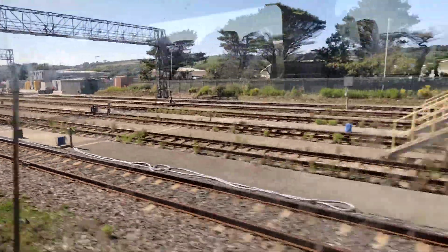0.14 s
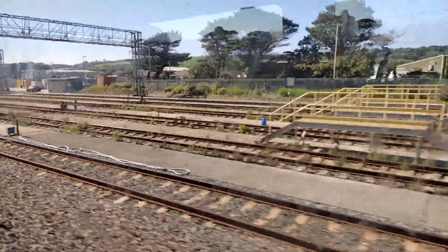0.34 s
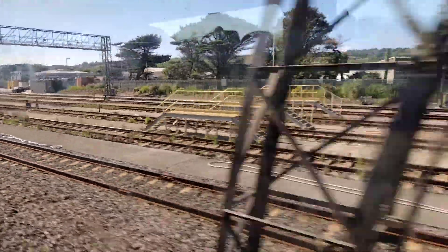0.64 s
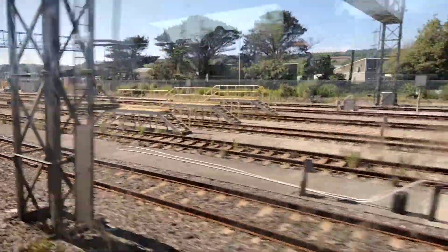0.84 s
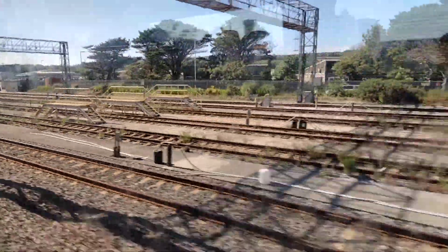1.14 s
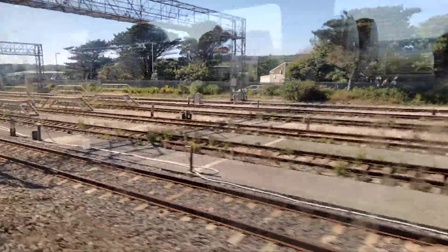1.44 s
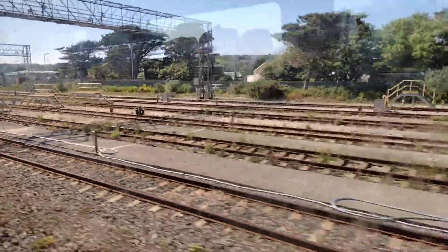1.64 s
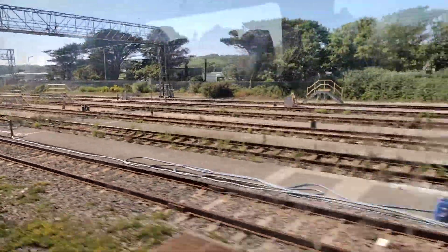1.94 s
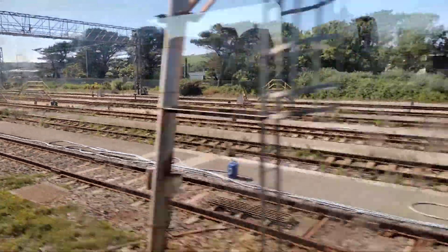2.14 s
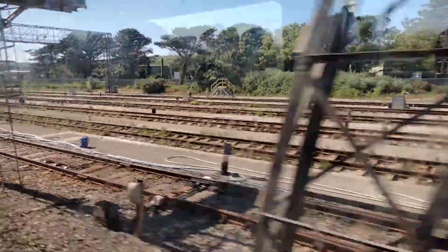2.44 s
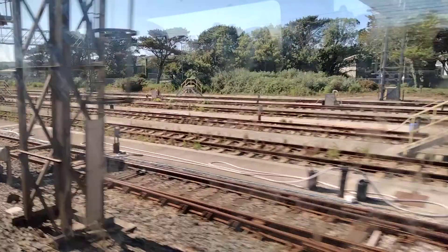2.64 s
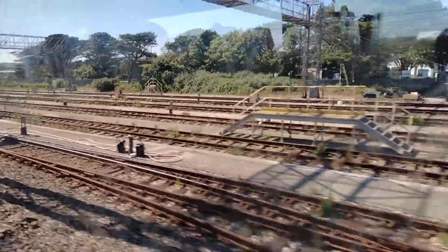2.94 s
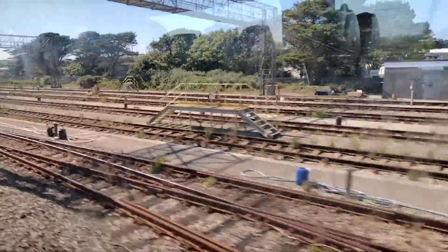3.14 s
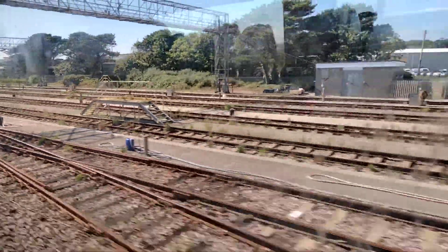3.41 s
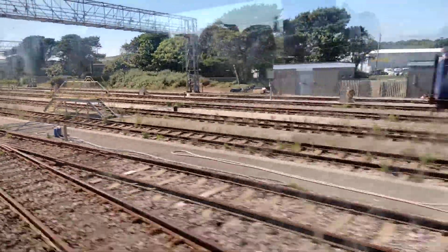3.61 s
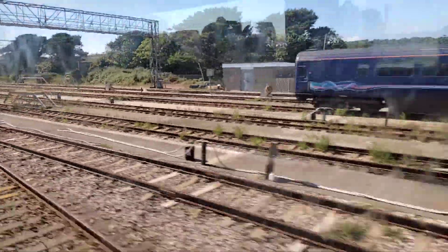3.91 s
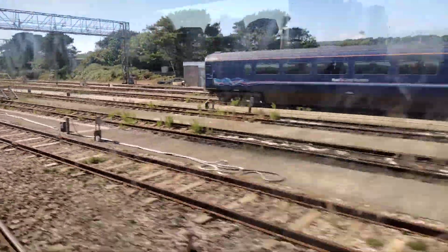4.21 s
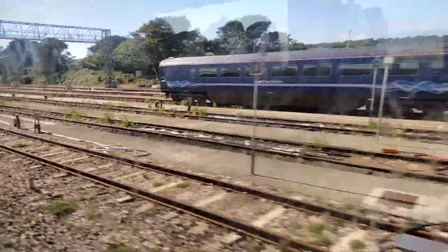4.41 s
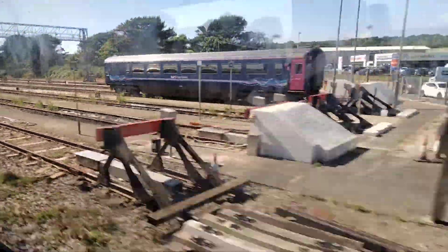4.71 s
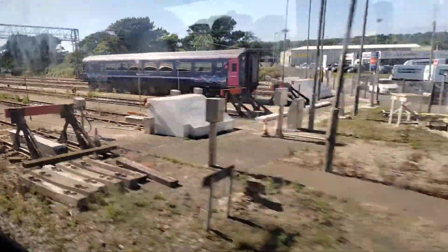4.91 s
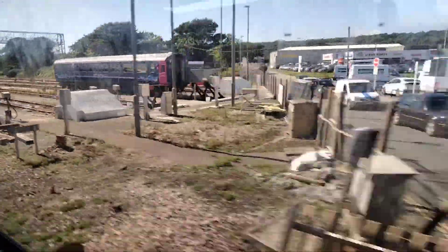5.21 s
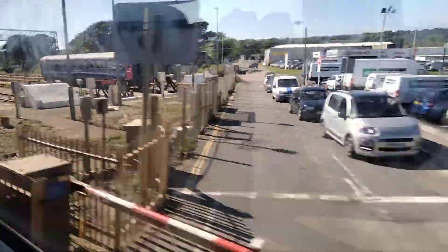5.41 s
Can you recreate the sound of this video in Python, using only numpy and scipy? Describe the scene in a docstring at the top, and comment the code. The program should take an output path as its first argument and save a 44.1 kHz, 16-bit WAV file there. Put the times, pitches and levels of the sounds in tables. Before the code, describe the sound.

Inside a moving train, deep wheel rumble and paired rail-joint knocks swell to a roar over points, with sharp rustles close by.

```python
"""Inside a passenger train rolling through a depot yard: wheels rumble through the floor, knock in pairs at the
rail joints and roar louder over a set of points, above the steady hum of machinery and the rush of air vents.
Close by, something rustles and scuffs in short, sharp bursts, and the swaying interior squeaks faintly.
Wheels, air and rubbing are filtered noise, the rubbing with random slips; hum and squeaks are sums of sines."""
import sys
import numpy as np
from scipy import signal
from scipy.fft import rfft, irfft
from scipy.io import wavfile
from scipy.ndimage import uniform_filter1d

SR = 44100
rng = np.random.default_rng(int(sys.argv[2]) if len(sys.argv) > 2 else 0)


def wav_record(signal):
    """Record a signal, one row per channel, as 16-bit PCM in the file named by sys.argv[1]."""
    frames = np.transpose(np.atleast_2d(signal))
    bounded = np.clip(frames, -1, 1)
    # unit amplitude maps onto the largest positive 16-bit level
    quanta = np.round(bounded * 32767).astype(np.int16)
    wavfile.write(sys.argv[1], SR, quanta)


N = 245188
TIME = np.arange(N) / SR
FREQ = np.maximum(np.arange(N // 2 + 1) * SR / N, 1)

# the track, plain at first and rough over the points; changes of level from plain track:
# time_s, floor_shaking_db, wheel_roughness_db
TRACK_CONDITION = [(0, 0, 0.5), (.6, 1, 0), (1.0, 1, 1), (2.3, 1, 1), (2.95, 2.5, 2.5), (3.22, 3, 3),
                   (3.62, 5.5, 5), (3.88, 8.5, 7), (4.15, 9, 10), (4.42, 9.5, 7), (4.52, 8.5, 4),
                   (4.76, 8, 6.5), (4.92, 9, 4), (5.13, 5, 3.5), (5.56, 6, 2)]
# rail joints, each knocked by one wheel after the other:
# first_knock_s, clatter_level_db, thud_level_db, second_knock_relative_db
RAIL_JOINTS = [(0.154, -52.5, -43.5, 5), (.425, -44.5, -34.5, -1), (1.023, -45, -46, -29),
               (1.625, -48.5, -59, -8), (2.488, -44, -53, -28), (2.733, -39, -48, -16),
               (2.984, -47, -32.5, 5.5), (3.158, -41, -50, -7.5), (3.326, -42, -39.5, 4),
               (3.495, -43, -46, -9), (3.676, -39.5, -35.5, 2), (4.003, -39, -31, 1),
               (4.277, -40.5, -30, 1), (4.583, -36, -29.5, -1), (4.875, -44.5, -45, -18),
               (5.183, -39, -41, -8.5), (5.315, -45, -48, -12)]

# narrow resonance that colours all close treble
TREBLE_PEAK_HZ, TREBLE_PEAK_WIDTH_HZ, TREBLE_PEAK_DB = 8745, 810, 15
CUTOFF_HZ = 15650


def from_db(db):
    """Amplitude ratio: 20 dB is a factor of ten."""
    return 10 ** (np.asarray(db) / 20)


def rms_one(x):
    """Normalization to unit mean power."""
    return x / np.sqrt(np.mean(x ** 2) + 1e-20)


def in_time(rows):
    """Linear interpolation of each column at every sample."""
    time_s, *columns = np.transpose(rows)
    return [np.interp(TIME, time_s, column) for column in columns]


def colour(points):
    """Spectral envelope, straight in dB over log frequency, with 24 dB per octave skirts beyond the ends."""
    hz, db = np.transpose(points)
    envelope = from_db(np.interp(np.log(FREQ), np.log(hz), db))
    skirts = np.minimum(FREQ / hz[0], 1) * np.minimum(hz[-1] / FREQ, 1)
    return envelope * skirts ** 4


def shaped(x, gain):
    """Linear filtering by multiplication in the frequency domain, then unit power."""
    return rms_one(irfft(rfft(x) * gain, N))


def drift(rate_hz):
    """Low-passed noise of unit spread: a random fluctuation, its gain halved at rate_hz."""
    return shaped(rng.standard_normal(N), 1 / (1 + (FREQ / rate_hz) ** 2))


def steady_noise(points, even_s):
    """Coloured noise divided by its running level, so its power is even over stretches longer than even_s."""
    noise = shaped(rng.standard_normal(N), colour(points))
    size = max(int(even_s * SR), 2)
    running_power = uniform_filter1d(uniform_filter1d(noise ** 2, size), size)
    return noise / np.sqrt(running_power + 1e-9)


def friction(per_s, spread_db, smooth):
    """Dry friction: tiny slips of uneven size at random moments, on a bed of smooth hiss."""
    size_db = spread_db * np.minimum(rng.exponential(1, N), 4)
    impulses = from_db(size_db) * rng.choice([-1, 1], N)
    slips = impulses * (rng.random(N) < per_s / SR)
    return rms_one(slips) + smooth * rng.standard_normal(N)


def resonance(hz, width_hz, db):
    """Resonance: one peak on a flat response, as a gain per frequency."""
    return np.sqrt(1 + (from_db(db) ** 2 - 1) / (1 + (2 * (FREQ - hz) / width_hz) ** 2))


def vents():
    """Flow noise: the air conditioning blows as stationary broadband noise, whatever the track does."""
    # air spectrum: frequency_hz, relative_level_per_hz_db
    air_spectrum = [(170, 0), (220, 11.5), (300, -2.5), (500, -9), (680, 0), (820, 9.5), (1000, 8),
                    (1150, 3), (1400, -3), (2000, -33.5)]
    return from_db(-54.5) * shaped(rng.standard_normal(N), colour(air_spectrum))


def machinery():
    """Periodic vibration: steady tones share a slight waver in pitch, and each wavers in strength."""
    # machinery tones: frequency_hz, mean_rms_level_db
    hum_tones = [(39.2, -48.5), (93.8, -45), (277.5, -61.5), (348.5, -61.5), (555.8, -57), (694.8, -58)]
    warped_time = np.cumsum(1 + 0.0018 * drift(rate_hz=2.5)) / SR
    out = np.zeros(N)
    for hz, db in hum_tones:
        rms = from_db(db + 1.54 * drift(rate_hz=3.9))
        out += rms * np.sqrt(2) * np.sin(2 * np.pi * (hz * warped_time + rng.random()))
    return out


def squeaks():
    """Stick-slip oscillation: brief tones of unsteady, gliding pitch with a few overtones."""
    # squeaks: start_s, length_s, pitch_hz, glide_share_of_pitch, unsteadiness_share_of_pitch,
    # level_before_resonance_db
    squeak_events = [(.45, 0.11, 9200, .05, .01, -75.5), (2.202, 0.054, 3780, 0.0036, .025, -76),
                     (2.265, 0.1, 2870, -0.03, 0.021, -69), (2.39, .14, 3670, -.022, 0.024, -75),
                     (2.69, 0.06, 3800, -0.01, .025, -70), (2.70, .05, 5700, 0, .012, -73),
                     (2.795, 0.06, 5640, 0, 0.0098, -71), (3.24, 0.19, 11650, 0, .022, -71),
                     (3.247, 0.17, 9270, -0.013, 0.029, -69.5), (3.25, .2, 14300, 0, .02, -75),
                     (4.375, .13, 4440, -0.027, 0.024, -62.5), (4.663, 0.059, 9000, -0.013, 0.015, -69),
                     (4.893, .05, 10200, 0, .014, -67), (5.496, 0.058, 3740, 0.011, .02, -68)]
    # fundamental and overtones: relative_level_db
    partial_levels = [4.5, -1, -5, -9]
    out = np.zeros(N)
    waver = drift(rate_hz=350)
    for start, length, hz, glide, unsteady, db in squeak_events:
        during = (TIME > start) & (TIME < start + length)
        progress = (TIME[during] - start) / length
        pitch_hz = hz * (1 + unsteady * waver[during]) * (1 + glide * (progress - .5))
        turns = np.cumsum(pitch_hz) / SR
        tone = np.zeros(len(turns))
        for k, partial_db in enumerate(partial_levels, 1):
            if k * hz < CUTOFF_HZ:
                tone += from_db(partial_db) * np.sin(2 * np.pi * k * turns)
        out[during] += from_db(db) * np.sin(np.pi * progress) * tone
    return irfft(rfft(out) * resonance(TREBLE_PEAK_HZ, TREBLE_PEAK_WIDTH_HZ, TREBLE_PEAK_DB), N)


def rustle():
    """Sliding friction: continuous light rubbing grows with the shaking, and each rub adds its power."""
    # rustle spectrum ahead of the resonance: frequency_hz, relative_level_per_hz_db
    rustle_spectrum = [(1800, 3), (3200, 1), (4400, -1), (5200, -0.5), (7500, -0.5), (9500, -2),
                       (10600, -7.5), (12500, -8), (14300, -5.5), (15500, -5.5)]
    # light rubs between the scuffs: start_s, length_s, peak_level_db
    light_rubs = [(-.08, 0.14, -64), (.12, 0.07, -69), (0.246, 0.52, -64), (1.027, .35, -63),
                  (2.167, 0.19, -59), (2.367, 0.21, -60.5), (2.67, 0.3, -61.5), (3.22, 0.82, -59.5),
                  (3.93, 0.27, -50), (4.31, 0.34, -53.5), (4.72, 0.45, -59), (5.46, 0.087, -59)]
    fullness = 0.32   # below 1 the swell of a rub is flat-topped
    shake_db, _ = in_time(TRACK_CONDITION)
    power = from_db(-71 + 1.77 * shake_db) ** 2   # dB of rubbing per dB of shaking
    for start, length, db in light_rubs:
        progress = np.clip((TIME - start) / length, 0, 1)
        swell = np.abs(np.sin(np.pi * progress)) ** fullness
        power = power + (from_db(db) * swell) ** 2
    gain = colour(rustle_spectrum) * resonance(TREBLE_PEAK_HZ, TREBLE_PEAK_WIDTH_HZ, TREBLE_PEAK_DB)
    rubbing = shaped(friction(per_s=3000, spread_db=-1.0, smooth=1.0), gain)
    return np.sqrt(power) * from_db(0.4 * drift(rate_hz=38)) * rubbing


def scuffs():
    """Friction exciting resonance: dense slips start sharply, last a moment and decay, each with its own ring."""
    # scuffs: start_s, level_db, rise_s, hold_s, t60_s, brightness_db_per_octave, ring_hz, ring_peak_db
    scuff_events = [ (1.594, -53.5, .003, 0.015, 0.29, -5, 4900, 3),
                    (1.632, -56, .005, .012, .14, -7, 4400, 0),
                    (1.769, -42.5, .006, .006, 0.17, -2, 5250, 8),
                    (2.106, -48, 0.0043, 0.0088, 0.17, 1.5, 5400, 4),
                    (2.308, -60, .003, .008, .12, 2, 11000, 4), (2.73, -49.5, .004, .01, .15, 0, 3880, 6),
                    (2.839, -55.5, .008, .01, 0.15, -4.5, 4400, 11),
                    (3.042, -43, 0.016, 0.026, 0.15, -3, 14000, 7),
                    (3.157, -58, 0.0078, 0.021, 0.23, -3, 15000, 5),
                    (3.486, -47.5, .004, 0.033, 0.42, -3.5, 9700, 7),
                    (3.673, -43.5, .009, .006, 0.23, -1, 4300, 2),
                    (3.76, -55, .004, .008, .11, 3, 12500, 10),
                    (3.869, -40, 0.019, 0.054, 0.46, -2.5, 10800, 8),
                    (4.065, -55, .002, 0.0053, .08, 7, 14200, 8), (4.297, -49, .005, .008, .12, 2, 9300, 5),
                    (4.343, -50.5, .003, .012, 0.2, 3, 12500, 4),
                    (4.379, -39, 0.031, .006, 0.37, -5.5, 9800, 16),
                    (4.774, -51, 0.018, 0.056, .25, -4, 14800, 11),
                    (5.007, -54.5, .015, .03, .15, -6, 14600, 11),
                    (5.286, -53.5, .003, .01, .4, -7, 4300, -3), ]
    # common scuff spectrum ahead of the resonances: frequency_hz, relative_level_per_hz_db
    scuff_spectrum = [(900, 5), (1700, 4.5), (2800, -0.5), (4300, 4.5), (5200, 2.5), (6500, 5.5),
                      (8000, 4.5), (9500, 3.5), (10600, 0.5), (12000, 1), (14200, 2), (15500, 1)]
    ring_width_hz = 2400
    out = np.zeros(N)
    gain = colour(scuff_spectrum) * resonance(TREBLE_PEAK_HZ, TREBLE_PEAK_WIDTH_HZ, TREBLE_PEAK_DB)
    slips = rfft(friction(per_s=2100, spread_db=3.0, smooth=1.0)) * gain
    for start, db, rise, hold, t60, bright_db, ring_hz, ring_db in scuff_events:
        age = TIME - start
        decay = from_db(-60 * np.clip((age - rise - hold) / t60, 0, 2))
        stroke = np.clip(age / rise, 0, 1) * decay
        tilt = from_db(bright_db * np.log2(FREQ / TREBLE_PEAK_HZ))
        tone = tilt * resonance(ring_hz, ring_width_hz, ring_db)
        out += from_db(db) * stroke * rms_one(irfft(slips * tone, N))
    return out * from_db(0.42 * drift(rate_hz=150))


def bumps():
    """Vibration isolation: the suspension softens each bump in the track into a short, low swell."""
    # bumps: start_s, level_db, length_s, centre_hz
    track_bumps = [(0.433, -34.5, 0.14, 65.5), (3.28, -31.5, .18, 48.8), (3.985, -33.5, 0.22, 87),
                   (4.258, -27.5, 0.14, 96), (4.682, -22, 0.145, 62), (5.27, -26.5, 0.11, 51.4)]
    width_oct = 0.33   # from the centre to where the gain is 1/e
    out, roughness = np.zeros(N), rng.standard_normal(N)
    for start, db, length, hz in track_bumps:
        swell = np.sin(np.pi * np.clip((TIME - start) / length, 0, 1))
        band = np.exp(-(np.log2(FREQ / hz) / width_oct) ** 2)
        thud = swell * shaped(roughness, band)
        # give the noise exactly the energy of its swell
        out += from_db(db) * thud * np.sqrt(np.sum(swell ** 2) / np.sum(thud ** 2))
    return out


def knocks(levels_db, t60):
    """Impact and exponential decay: power of the double knocks at the joints, each rising, held and dying away."""
    wheel_gap_s, rise_s, hold_s = 0.083, 0.007, 0.017
    power = np.zeros(N)
    for (start, _, _, second_db), db in zip(RAIL_JOINTS, levels_db):
        first_age = TIME - start
        for age, knock_db in ((first_age, db), (first_age - wheel_gap_s, db + second_db)):
            fall = np.clip((age - rise_s - hold_s) / t60, 0, 2)
            power += (np.clip(age / rise_s, 0, 1) * from_db(knock_db - 60 * fall)) ** 2
    return power


def wheels():
    """Rolling noise: roughness shakes the floor, booms and roars through the windows; joints add impacts."""
    # spectra of floor rumble, carriage boom, wheel roar, rail hiss and the bogie's answer to a knock:
    # frequency_hz, relative_level_per_hz_db
    rumble_spectrum = [(12, -14), (22, 1.5), (30, -6.5), (39, -1), (52, -5), (66, -4), (80, -9), (100, -7),
                       (125, -26.5), (160, -23.5)]
    boom_spectrum = [(85, -34), (118, 1), (150, 1.5), (180, -7.5), (215, -3.5), (250, -9), (277, -11.5),
                     (315, -12), (380, -13.5), (480, -13.5), (600, -18.5)]
    roar_spectrum = [(250, -26), (330, -6), (380, -4.5), (460, -6), (530, -1.5), (600, 1.5), (680, -1.5),
                     (760, -4.5), (870, -13), (980, -8), (1150, -15.5), (1400, -22.5), (2500, -41)]
    hiss_spectrum = [(800, -3), (1200, -4.5), (1550, -0.5), (2050, -2.5), (2600, -10), (3300, -16.5),
                     (5000, -22.5), (7500, -18.5), (8800, -23), (10500, -21.5), (13500, -30), (15500, -26)]
    thud_spectrum = [(100, -5), (125, 1.5), (150, 2), (172, -10), (200, -24)]
    shake_db, rough_db = in_time(TRACK_CONDITION)
    _, clatter_db, thud_db, _ = np.transpose(RAIL_JOINTS)
    clatter_power = knocks(clatter_db, t60=0.31)
    thud_power = knocks(thud_db, t60=0.24)
    judder = from_db(0.4 * drift(rate_hz=47))

    # level in dB on plain track, plus dB per dB of roughness
    boom_level = from_db(-49.5 + 1.84 * rough_db)
    rolling_roar = from_db(-52 + 1.07 * rough_db)
    rolling_hiss = from_db(-61.5 + 0.9 * rough_db)
    # independent sources add in power; a knock hisses 20 dB below its clatter
    roar_level = np.sqrt(rolling_roar ** 2 + clatter_power)
    hiss_level = np.sqrt(rolling_hiss ** 2 + from_db(-20) ** 2 * clatter_power)

    rumble = from_db(-35 + shake_db) * steady_noise(rumble_spectrum, even_s=0.13)
    boom = boom_level * judder * steady_noise(boom_spectrum, even_s=0.071)
    roar = roar_level * judder * steady_noise(roar_spectrum, even_s=0.053)
    hiss = hiss_level * np.sqrt(judder) * steady_noise(hiss_spectrum, even_s=0.035)
    thuds = np.sqrt(thud_power) * steady_noise(thud_spectrum, even_s=0.035)
    return rumble + boom + roar + hiss + thuds


def scene():
    """Superposition: the pressures of all sources add, as heard from a window seat."""
    background = vents() + machinery()
    close_by = squeaks() + rustle() + scuffs()
    return (background + close_by + bumps() + wheels())[None]


def record(dry):
    """Band limiting: a steep elliptic low-pass cuts the top."""
    low_pass = signal.ellip(14, .1, 80, CUTOFF_HZ, fs=SR, output="sos")   # order, ripple dB, stopband dB
    return signal.sosfilt(low_pass, dry)


dry = scene()
out = record(dry)
wav_record(out)
```